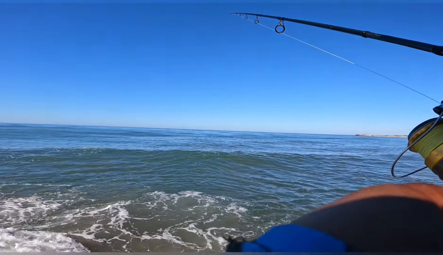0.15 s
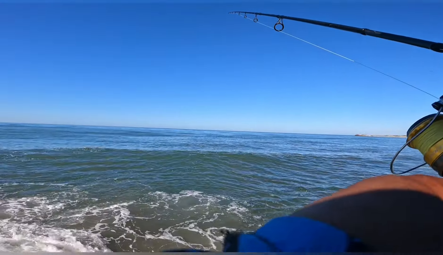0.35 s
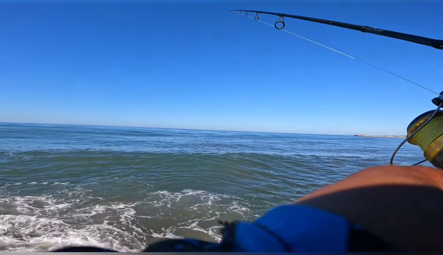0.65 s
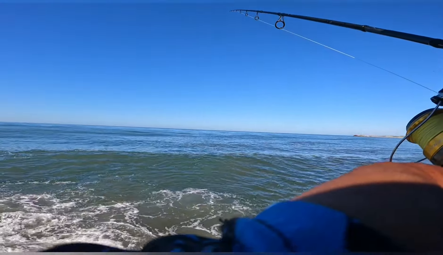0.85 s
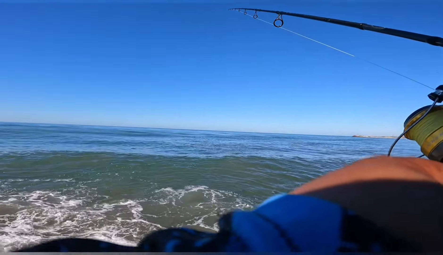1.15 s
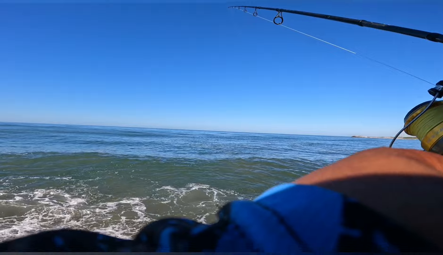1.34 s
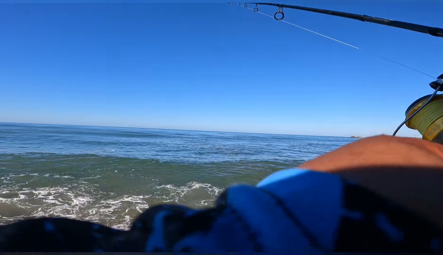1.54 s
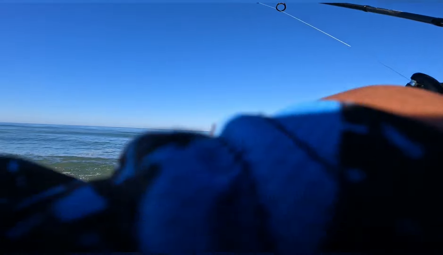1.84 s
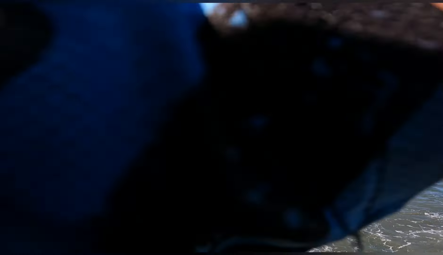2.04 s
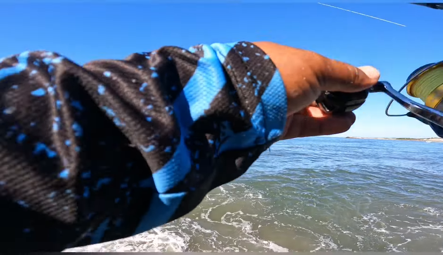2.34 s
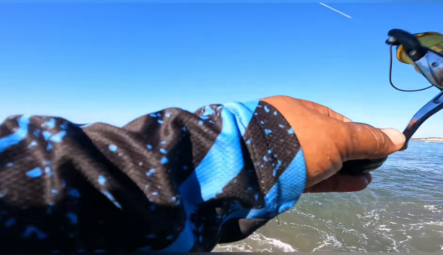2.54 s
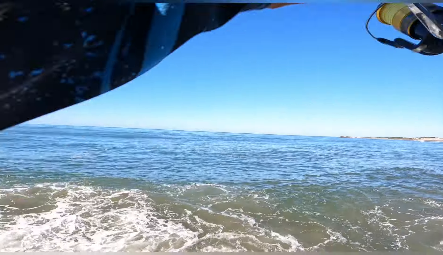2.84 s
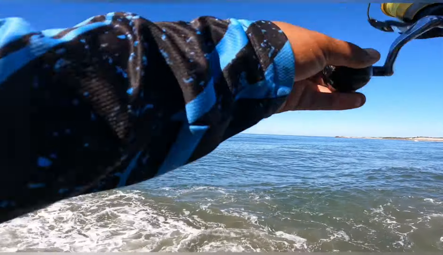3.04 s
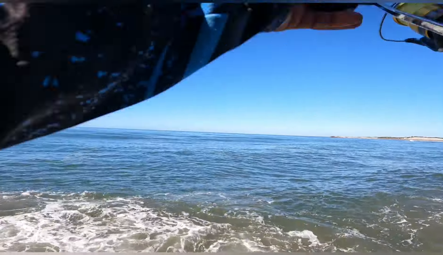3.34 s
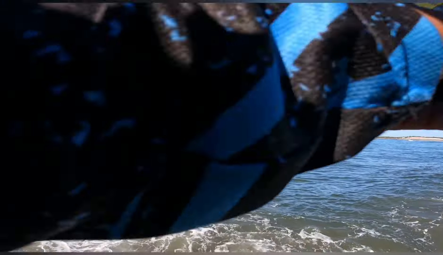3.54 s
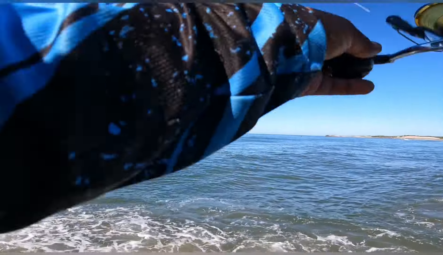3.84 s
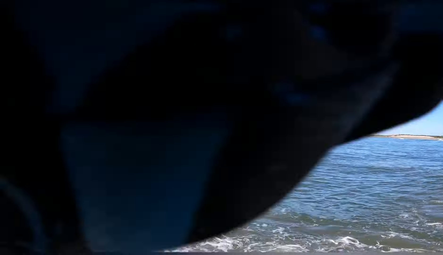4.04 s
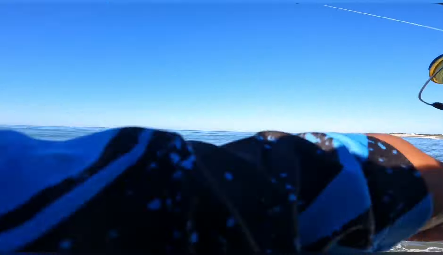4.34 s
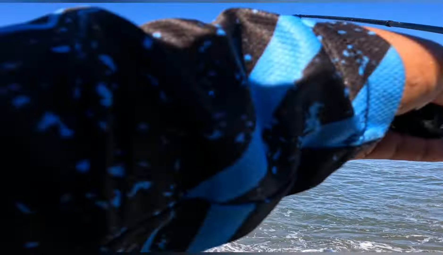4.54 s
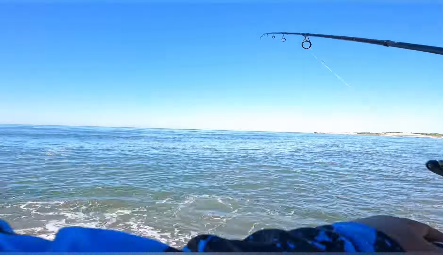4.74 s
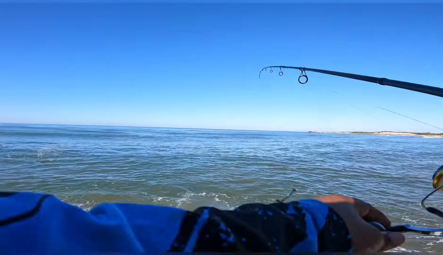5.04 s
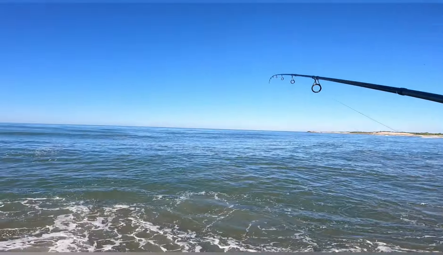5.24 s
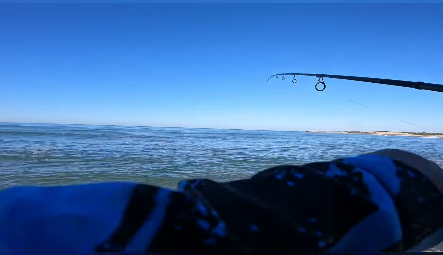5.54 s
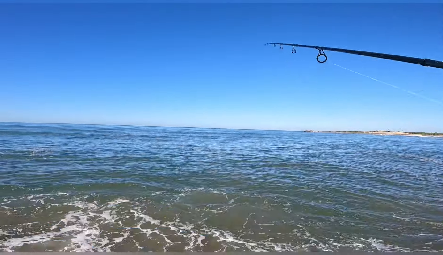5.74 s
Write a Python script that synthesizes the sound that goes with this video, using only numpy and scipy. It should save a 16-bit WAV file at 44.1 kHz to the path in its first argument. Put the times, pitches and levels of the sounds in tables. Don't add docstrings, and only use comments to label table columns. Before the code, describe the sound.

Wind thuds on a cloth-covered microphone by the sea as broken water washes, fabric scrapes, and a bigger wave breaks and slaps on rocks.

```python
import sys
import numpy as np
from scipy import signal
from scipy.fft import rfft, irfft
from scipy.io import wavfile
from scipy.ndimage import uniform_filter1d

SR = 44100
rng = np.random.default_rng(int(sys.argv[2]) if len(sys.argv) > 2 else 0)


def master(y):
    cut = np.clip(np.atleast_2d(y).T, -1, 1)
    pcm = np.round(cut * 32767)
    wavfile.write(sys.argv[1], SR, pcm.astype(np.int16))


def volts_from_decibels(level):
    exponent = np.asarray(level, float) / 20
    return 10 ** exponent


N = 259308


def evened(x):
    return x / np.sqrt(np.mean(x ** 2) + 1e-20)


def curve(rows, axis, lag_s=0.):
    table = np.transpose(rows)
    values = np.interp(np.arange(N) / SR - lag_s, table[0], table[axis])
    return uniform_filter1d(values, size=3000)


def colour(x, shape):
    f, level_db = np.transpose(shape)
    hz = np.fft.rfftfreq(len(x), 1 / SR)
    gain_db = np.interp(np.log(hz + 1), np.log(f + 1), level_db, left=-120, right=-120)
    return evened(irfft(rfft(x) * volts_from_decibels(gain_db), len(x)))


def flicker(per_s):
    hz = np.fft.rfftfreq(N, 1 / SR)
    gain = (hz > 2) / (1 + (hz / per_s) ** 2)
    return evened(irfft(rfft(rng.standard_normal(N)) * gain, N))


def patchy(patch_db, count_t, count_f):
    a, b, patches = rng.standard_normal((N // 128 + 5, 257, 3)).T
    patches = uniform_filter1d(patches, count_f, 0)
    patches = evened(uniform_filter1d(patches, count_t, 1))
    grains = (a + 1j * b) * volts_from_decibels(patch_db * patches)
    return signal.istft(grains, nperseg=512, noverlap=384)[1][:N]


def pops(per_s, spread_db):
    size_db = spread_db * np.minimum(rng.exponential(1, N), 5)
    clicks = volts_from_decibels(size_db) * rng.choice([-1., 1.], N)
    return evened(clicks * (rng.random(N) < per_s / SR))


def bump(s, length):
    first = max(round((s - 2 * length) * SR), 0)
    last = min(round((s + 2 * length) * SR), N)
    at = np.arange(first, last)
    t = at / SR - s
    return at, t, np.exp(-(2 * t / length) ** 2)


def swells(rows):
    out = np.zeros(N)
    for s, db, length in rows:
        at, _, shape = bump(s, length)
        out[at] += volts_from_decibels(db) * shape
    return out


def pushes(rows):
    out = np.zeros(N)
    for s, db, length, hz in rows:
        at, t, shape = bump(s, length)
        out[at] += volts_from_decibels(db) * shape * np.cos(2 * np.pi * hz * t)
    return out


def steadied(x, share, size):
    power = abs(uniform_filter1d(uniform_filter1d(x ** 2, size), size))
    return evened(x / (power + 0.055) ** (share / 2))


def lull(rows):
    covered = swells([(s, 0, length) for s, _, length, _ in rows])
    return 1 - 0.2 * np.minimum(covered, 1)


def summed(a_db, b_db):
    return np.hypot(volts_from_decibels(a_db), volts_from_decibels(b_db))


def wave_rise(lag_s):
    quiet_sea_db = -30
    return curve(SURF, axis=1, lag_s=lag_s) - quiet_sea_db


def hiss():
    return volts_from_decibels(-103) * rng.standard_normal(N)


# (time [s], level [dB], length [s])
SPITS = [
    (1.555, -82, .008),
    (2.08, -89, .04),
    (2.515, -85, .018),
    (2.788, -81, .012),
    (3.322, -79.5, .014),
]
# (pitch [Hz], level [dB])
SPIT_TONE = [(4000, -20), (5200, 2), (6800, 2), (10300, -3), (11500, -30)]


def spray():
    return swells(SPITS) * colour(rng.standard_normal(N), SPIT_TONE)


# (time [s], level [dB])
FOAM = [(0, -66), (.35, -72.5), (.9, -71), (1.3, -73.5), (2.0, -72.5), (2.12, -67.5), (2.45, -69),
        (2.62, -71), (2.9, -66.5), (3.2, -65.5), (3.45, -62), (3.85, -64), (4.12, -63.5), (4.4, -60.5),
        (4.7, -63), (4.95, -66.5), (5.35, -66), (5.88, -69)]
# (time [s], level [dB], length [s])
SURGES = [
    (2.68, -69.5, 0.055),
    (2.82, -66, 0.1),
    (3.95, -63.5, 0.089),
    (5.1, -66.5, 0.14),
    (5.58, -68, 0.1),
]
# (pitch [Hz], level [dB])
CAVITY = [(10200, -72), (10550, -34), (10900, -22), (11300, -8), (11800, 1), (12200, 3), (12900, -7),
          (13800, -3.5), (14300, -8), (14800, -16.5), (15750, -15), (15800, -57.5)]


def foam():
    fizz = evened(patchy(patch_db=0.3, count_t=5, count_f=14)) + 0.5 * pops(per_s=1500, spread_db=4)
    fizz = colour(fizz * volts_from_decibels(0.8 * flicker(per_s=60)), CAVITY)

    def above(hz):
        return signal.sosfiltfilt(signal.butter(6, hz, "high", fs=SR, output="sos"), fizz)

    fine, finest = above(12800), above(14700)
    foam_gain = volts_from_decibels(curve(FOAM, axis=1))
    fine_gain = volts_from_decibels(-66 + 1.05 * (curve(FOAM, axis=1, lag_s=0.1) + 66))
    surge = 0.6 * swells(SURGES)
    growth = volts_from_decibels(0.3 * np.arange(N) / SR)
    upper = volts_from_decibels(-6) * evened(fine - finest) + volts_from_decibels(-15) * growth * evened(finest)
    return (foam_gain + surge) * evened(fizz - fine) + (fine_gain + 0.9 * surge) * upper


# (time [s], peak level [dB], length [s])
RUBS = [(1.87, -59.5, 0.058), (1.91, -69, 0.099), (1.95, -59.5, 0.037), (2.03, -60, .05),
        (2.055, -52.5, 0.017), (2.074, -44.5, 0.032), (2.096, -53, .015), (2.117, -54, 0.023),
        (3.96, -61, .04), (4.165, -53, 0.017), (4.28, -59, .04), (4.57, -48, 0.047), (4.84, -58, 0.11),
        (5.0, -60.5, .04)]
# (pitch [Hz], level [dB])
CLOTH = [(700, -25.5), (1400, -4.5), (2000, 3.5), (2600, 4.5), (3300, -6), (3900, -24), (4550, -16.5),
         (5200, -28.5), (5900, -28), (6800, -50)]
# (time [s], peak level [dB], length [s])
DRAGS = [
    (2.072, -57, 0.035),
    (2.11, -55, 0.026),
    (4.17, -46.5, .04),
    (4.63, -50, 0.094),
]
# (pitch [Hz], level [dB])
DRAG_TONE = [(1100, -29.5), (1600, 1), (2000, 9), (2500, -16.5), (3200, -38)]


def sleeve():
    fibres = rng.standard_normal(N) + 0.31 * pops(per_s=2400, spread_db=5)
    return swells(RUBS) * colour(fibres, CLOTH) + swells(DRAGS) * colour(fibres, DRAG_TONE)


# (time [s], peak level [dB], length [s],
# pitch [Hz])
KNOCKS = [
    (.012, -17, 0.012, 306),
    (.052, -15, 0.0044, 150),
    (0.279, -31, 0.033, 67.6),
    (.386, -11, .006, 149),
    (2.082, -20.5, 0.022, 86),
    (2.521, -16, 0.013, 264),
    (2.78, -18, 0.0066, 152),
    (5.879, -18, .02, 70),
]


def knocks():
    return pushes(KNOCKS)


# (time [s], level [dB], extra level of the largest eddies [dB])
WIND = [(0, -25, -18), (.35, -29.5, -4), (.7, -31.5, 2.5), (1.2, -33.5, -1), (1.7, -35, 0),
        (1.95, -34.5, 2.5), (2.4, -40, 3), (2.8, -35.5, 4), (3.1, -43.5, -1.5), (3.45, -33.5, -4),
        (3.8, -36, -2), (4.2, -28.5, -4), (4.6, -33, -7), (4.8, -32, -9.5), (5.05, -24, -5.5),
        (5.3, -32, -6), (5.6, -28.5, -6.5), (5.88, -30.5, -16)]
# (time [s], peak level [dB], length [s], pitch [Hz])
GUSTS = [(0.205, -24.8, 0.088, 84.4), (0.567, -21.5, 0.047, 54), (0.73, -17, 0.03, 52),
         (1.107, -19.5, 0.041, 39), (1.219, -24.5, 0.054, 69.4), (1.382, -21.5, 0.053, 47),
         (1.573, -24.5, 0.056, 109), (1.671, -26, 0.041, 69), (1.687, -20.5, 0.06, 41),
         (2.387, -28.5, 0.064, 51.4), (2.784, -29.5, 0.065, 39.3), (2.789, -33.5, 0.06, 86),
         (3.405, -32, 0.06, 64.6), (3.908, -23, 0.074, 113), (4.224, -26, 0.053, 75),
         (4.274, -21.5, 0.06, 72), (4.302, -24.5, 0.066, 42.8), (4.336, -24.5, 0.052, 104),
         (4.413, -28, 0.079, 54), (4.581, -18.5, 0.041, 95), (4.613, -19, 0.057, 43.3),
         (4.845, -17, 0.042, 79), (5.011, -20.5, 0.06, 60), (5.036, -24, 0.06, 28), (5.08, -15, 0.054, 75),
         (5.325, -23, 0.06, 42.7), (5.5, -17.5, 0.069, 65.4), (5.663, -23, 0.067, 39)]
# (pitch [Hz], level [dB])
BUFFET = [(5, -13), (20, -4.5), (42, 3), (55, -5.5), (80, -31.5)]
THUD = [(30, -28), (50, -5), (70, 2), (100, -5), (140, -30)]
FLUTTER = [(65, -32), (100, -2.5), (140, 2.5), (200, -4), (290, -16)]


def wind():
    def eddies(shape):
        return steadied(colour(rng.standard_normal(N), shape), share=0.18, size=2000)

    blow_db = curve(WIND, axis=1)
    large = volts_from_decibels(curve(WIND, axis=2)) * eddies(BUFFET)
    low = volts_from_decibels(blow_db + 0.5) * (large + eddies(THUD)) * lull(GUSTS)
    flutter_gain = summed(blow_db - 0.5, -39.5 + 1.86 * wave_rise(lag_s=0.35))
    return low + flutter_gain * eddies(FLUTTER) * lull(SLAPS) + pushes(GUSTS)


# (time [s], level change [dB], length [s])
SHADES = [
    (1.65, -0.5, 0.27),
    (2.4, -2.5, 0.38),
    (3.2, -2, 0.17),
    (5.38, 0.5, 0.053),
]


def arm_shade():
    out = np.zeros(N)
    for s, change_db, length in SHADES:
        at, _, shape = bump(s, length)
        out[at] += change_db * shape
    return out


# (time [s], level [dB], length [s])
SPLASHES = [
    (0.8, -56.5, 0.17),
    (2.9, -60.5, 0.42),
    (3.42, -48, 0.069),
    (4.17, -44, .05),
    (4.62, -55.5, 0.16),
]
# (pitch [Hz], level [dB])
WASH_TONE = [(760, -25), (1300, 1), (1430, -4.5), (1740, -4), (2420, -12), (2830, -17.5), (3090, -26.5),
             (3470, -30.5), (3910, -39.5), (4900, -42.5), (6100, -53), (6600, -65.5), (9000, -84.5)]


def wash():
    water = evened(patchy(patch_db=1.6, count_t=10, count_f=8)) + 0.33 * pops(per_s=410, spread_db=2)
    water = colour(water * volts_from_decibels(0.26 * flicker(per_s=46)), WASH_TONE)
    level_db = -50.5 + arm_shade() + 0.51 * wave_rise(lag_s=0)
    level_db = level_db + 0.21 * (curve(FOAM, axis=1) + 70)
    return (volts_from_decibels(level_db) + 0.21 * swells(SPLASHES)) * water


# (pitch [Hz], level [dB])
BOOM_TONE = [(120, -27), (200, 1.5), (300, 1), (390, -1), (520, -34.5)]


def boom():
    clouds = steadied(colour(patchy(patch_db=0.9, count_t=14, count_f=1), BOOM_TONE), share=0.23, size=1500)
    gain = summed(curve(WIND, axis=1) - 2, -30.5 + 0.96 * wave_rise(lag_s=0.14))
    return gain * clouds * lull(SLAPS)


# (time [s], peak level [dB], length [s], pitch [Hz])
SLAPS = [(0.275, -21.5, 0.04, 281), (0.346, -21.5, 0.036, 180), (0.57, -23.5, 0.034, 336),
         (0.591, -19.5, 0.025, 137), (0.906, -21, 0.021, 367), (1.404, -19, 0.02, 246),
         (1.465, -22.5, 0.026, 131), (2.736, -21, 0.021, 164), (3.317, -18, 0.017, 336),
         (3.568, -18, 0.029, 351), (3.588, -17.5, 0.033, 235), (3.626, -15.5, 0.015, 215),
         (3.658, -15.5, 0.025, 307), (3.838, -18, 0.036, 225), (3.905, -16.5, 0.019, 126),
         (4.182, -18.5, 0.024, 225), (4.238, -17.5, 0.021, 367), (4.33, -19, 0.021, 115),
         (4.41, -16.5, 0.028, 188), (4.567, -15.5, 0.036, 269), (4.787, -16.5, 0.02, 180),
         (5.036, -19, 0.03, 307), (5.04, -18.5, 0.03, 144), (5.091, -15.5, 0.03, 180),
         (5.724, -19.5, 0.028, 137), (5.745, -24, 0.057, 257)]
# (time [s], peak level [dB], length [s], pitch [Hz])
LAPS = [
    (0.152, -17.5, 0.0069, 695),
    (0.431, -20, 0.0093, 603),
    (0.466, -14.5, 0.008, 571),
    (0.547, -19, 0.008, 557),
    (0.648, -25, 0.0074, 592),
    (1.83, -30, 0.0068, 700),
    (2.448, -17, 0.0068, 620),
    (3.887, -12, 0.012, 514),
    (4.879, -14, 0.008, 585),
]


def slaps():
    laps = [(s + 0.00389, db - 4, length, hz) for s, db, length, hz in LAPS]
    return pushes(SLAPS) + pushes(laps)


# (time [s], level [dB])
SURF = [(0, -29.5), (.5, -29.5), (1.03, -29), (1.67, -31), (2.1, -28.5), (2.55, -30), (2.85, -28.5),
        (3.15, -30.5), (3.3, -25), (3.6, -24), (3.93, -22.5), (4.36, -24.5), (4.63, -22.5), (4.97, -25.5),
        (5.1, -23.5), (5.4, -26), (5.65, -24), (5.88, -25.5)]
# (pitch [Hz], level [dB])
ROAR_TONE = [(290, -24.5), (420, 0.5), (750, 0.5), (900, -5), (1150, -14.5), (1500, -35)]


def roar():
    bubbles = colour(patchy(patch_db=0.57, count_t=14, count_f=3), ROAR_TONE)
    return volts_from_decibels(curve(SURF, axis=1)) * steadied(bubbles, share=0.043, size=1500)


def scene():
    body = hiss() + spray() + foam() + sleeve() + knocks()
    sea = wash() + boom() + slaps() + roar()
    return (body + wind() + sea)[None]


def roll_off(x):
    return signal.sosfilt(signal.butter(12, 15720, fs=SR, output="sos"), x)


def record(dry):
    from_end = np.minimum(np.arange(N), np.arange(N)[::-1])
    ramp = np.minimum(from_end / (0.001 * SR), 1)
    eased = dry * (1 - 0.65 * np.cos(np.pi / 2 * ramp) ** 2)
    return roll_off(eased)


dry = scene()
out = record(dry)
master(out)
```